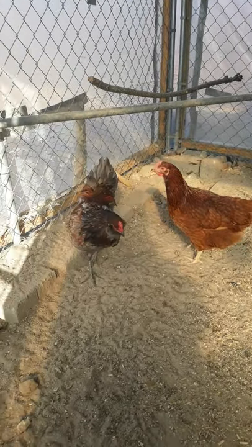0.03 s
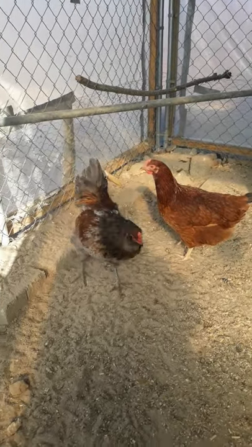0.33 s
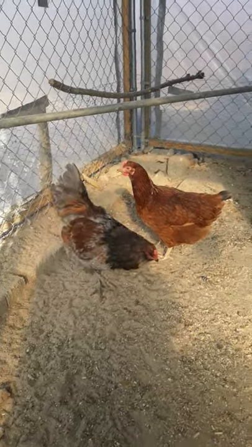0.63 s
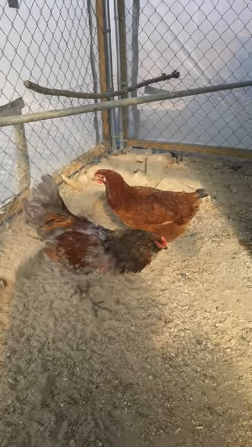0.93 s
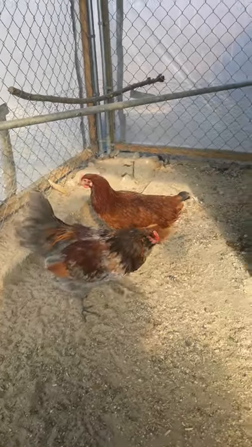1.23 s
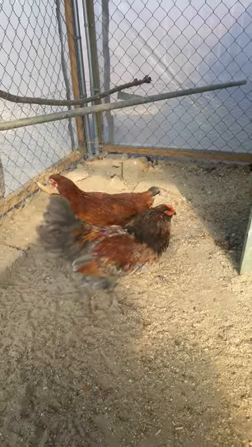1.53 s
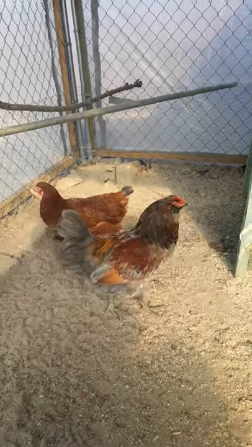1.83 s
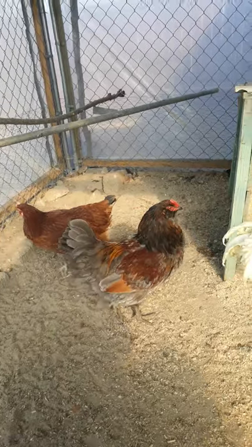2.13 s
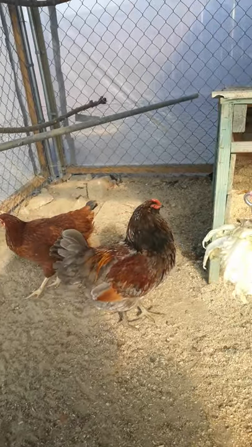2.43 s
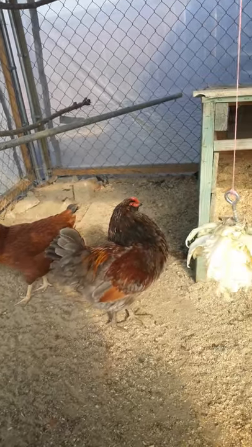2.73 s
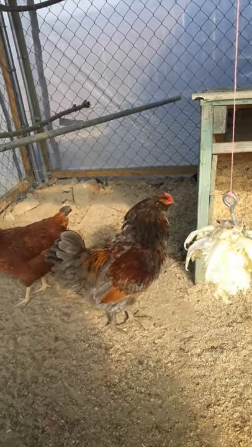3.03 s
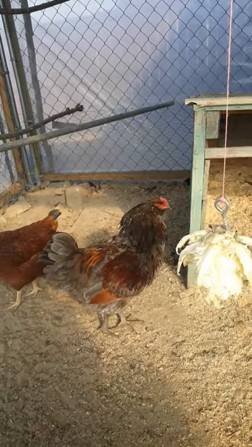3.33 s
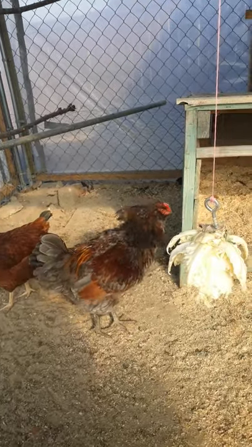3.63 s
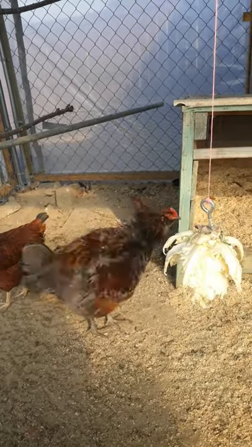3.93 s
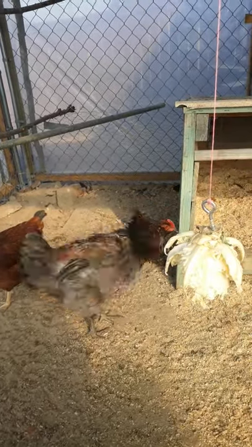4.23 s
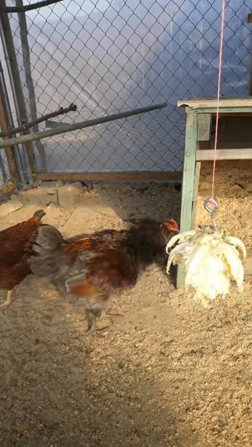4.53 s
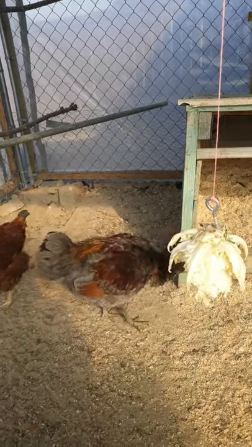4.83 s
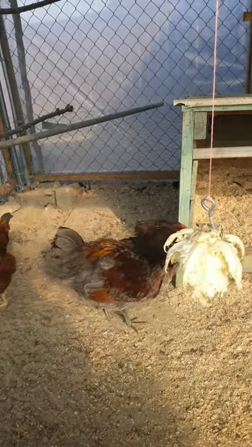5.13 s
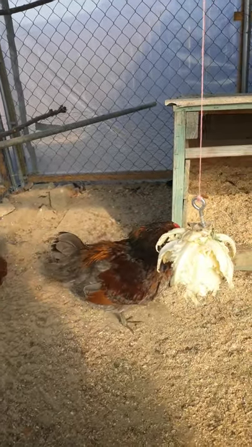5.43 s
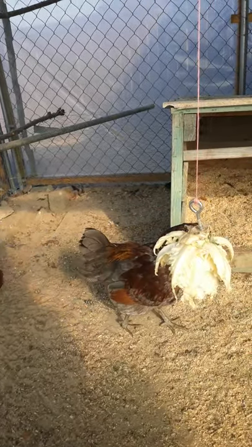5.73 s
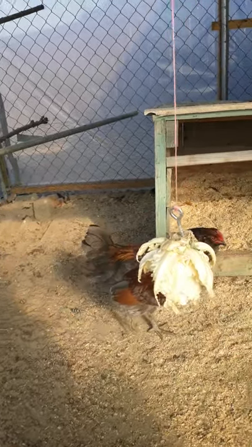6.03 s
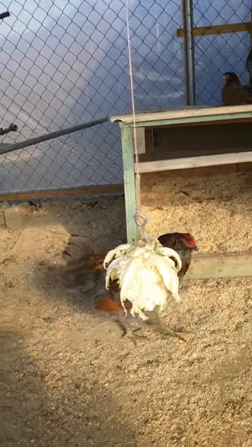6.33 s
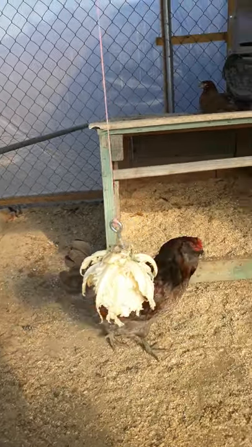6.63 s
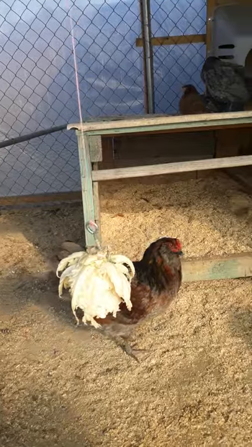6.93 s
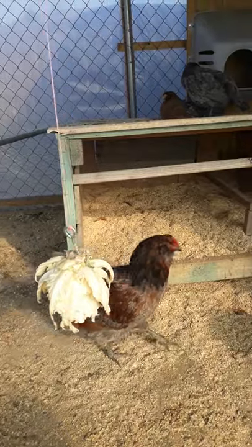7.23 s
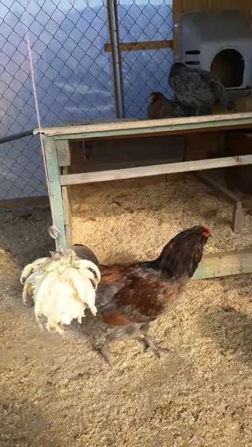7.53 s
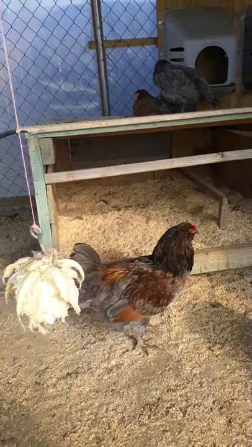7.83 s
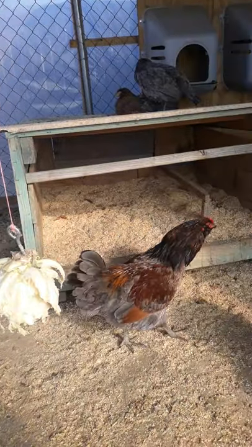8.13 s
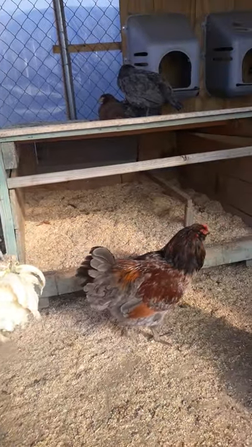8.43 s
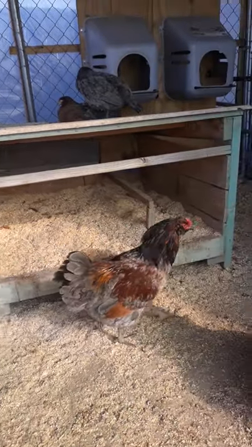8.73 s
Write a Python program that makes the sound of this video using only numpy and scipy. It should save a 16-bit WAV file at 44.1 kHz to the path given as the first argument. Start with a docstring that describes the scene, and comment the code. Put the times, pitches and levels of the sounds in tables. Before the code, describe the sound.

In the first second a rooster gives four short, soft clucks close by in a chicken run, the first the loudest. Outside, a truck approaches with a low drone, rumble and tyre hiss, loudest from about 2 to 3.5 seconds, its note sinking as it passes. Faint rustles of feet in dry bedding sound underneath. From about 3.9 to 4.5 seconds the rooster shakes out his feathers in a quick, papery flutter of several beats. Light rustles and gritty ticks follow, with a barely audible ring of a metal hook and one tiny cluck around 5 seconds. From about 5.4 to 6.2 seconds a faint squeal stutters, like distant brakes. The truck recedes, leaving a low, throbbing engine hum and a few soft steps and claw scuffs until the end at 9 seconds. Very faint, thin, even ticking and hiss run throughout.

```python
"""Soft clucks of a rooster sound over an approaching truck: pulses of his syrinx excite his vocal tract.
The truck passes fast; its exhaust note sinks by the Doppler shift and beats against a far engine's hum.
In his foil-walled run the bird shakes out his feathers, brushes a metal hook and walks off over dry
bedding, which rustles by stick-slip friction. Once the truck has gone by, a faint squeal stutters,
probably from brakes."""
import sys
import numpy as np
from scipy import signal
from scipy.fft import rfft, irfft
from scipy.io import wavfile

SR = 44100
rng = np.random.default_rng(int(sys.argv[2]) if len(sys.argv) > 2 else 0)


def materialize(psi):
    """Save the field psi as 16-bit PCM at rate SR to the path in sys.argv[1].

    A 1-D psi becomes a single channel; in a 2-D psi each row is a channel.
    """
    bounded = np.clip(np.atleast_2d(psi).T, -1, 1)
    quanta = np.round(bounded * 32767).astype(np.int16)
    wavfile.write(sys.argv[1], SR, quanta)


N = 396459
TIME = np.arange(N) / SR
FREQS = np.maximum(np.arange(N // 2 + 1) * SR / N, 1)
SPEED_M_PER_S, SOUND_M_PER_S = 33.95, 343
ROAD_M, NEAREST_S = 48.34, 3.024  # the truck's closest approach

# stereo balance of the bird and of the road: (frequency [Hz], left minus right [dB])
BIRD_SIDE = [(200, -1), (380, -4), (700, 1.5), (1300, 3.5), (1900, 6), (2500, 0), (3100, -4.5), (3800, -9),
             (4700, -10), (5700, -8), (7200, -12.5), (8300, -11), (15000, -9)]
ROAD_SIDE = [(110, -0.5), (200, -0.5), (300, -2), (420, -4), (580, -1.5), (750, 1.3), (1300, 3.5),
             (1650, 5), (2000, 8), (2500, 4.5), (3100, -2), (3800, -7), (4700, -8), (5700, -5.5),
             (7200, -8), (8200, -4), (15000, 11)]


def clucks(jitter, rasp):
    """Source and filter: uneven pulses of the syrinx excite resonances of chest, throat, mouth and beak."""
    # (time [s], length [s], pitch [Hz], level [dB], throat [Hz], mouth [Hz], mouth [dB], beak [dB])
    calls = [(.111, .032, 352, -32, 740, 1930, -11, -32), (.5, .028, 270, -37.5, 850, 1880, -10, -38),
             (.65, .038, 285, -38, 820, 1780, -19, -48), (.812, .034, 240, -38.5, 810, 1950, -19, -48),
             (5.122, .027, 255, -50.5, 980, 1450, -7, -45)]
    # resonances common to all clucks: (frequency [Hz], width [Hz], gain [dB])
    chest = (430, 340, -1.5)
    beak = [(2850, 500, -3), (3750, 600, -5), (5900, 700, -1), (7100, 900, 0)]
    throat_width_hz, mouth_width_hz, ramp_s = 340, 380, .005
    out, wobble, breath = np.zeros(N), drift(300), rng.standard_normal(N)
    for s, length, pitch_hz, level_db, throat_hz, mouth_hz, mouth_db, beak_db in calls:
        near = span(s - .02, s + .12)
        age = TIME[near] - s
        opening = np.clip(np.minimum(age, length - age) / ramp_s, 0, 1)
        cycles = np.cumsum(pitch_hz * (1 + jitter * wobble[near]) * (age > 0)) / SR
        pulses = np.diff(np.floor(cycles), prepend=0) * np.sqrt(SR / pitch_hz)
        source = opening * (pulses + rasp * breath[near])
        tract = [chest, (throat_hz, throat_width_hz, 0), (mouth_hz, mouth_width_hz, mouth_db)]
        lowpass = signal.butter(6, 1.17 * mouth_hz, fs=SR, output="sos")
        call = signal.sosfilt(lowpass, ring_in(source, tract)) + from_db(beak_db) * ring_in(source, beak)
        out[near] += from_db(level_db) * call / np.sqrt(np.sum(call ** 2) / (length * SR))
    muffled = 1 / (1 + (FREQS / 8000) ** 20)
    return irfft(rfft(out) * muffled * pan(per_hz(BIRD_SIDE)), N)


def feathers():
    """Stick-slip friction: stiff feathers flick at each swing of the body and in lighter ruffles."""
    # swings of the shake: (peak time [s], rise [s], fall [s], relative level [dB])
    swings = [(3.925, .012, .035, -57), (3.998, .015, 0.036, -47), (4.095, 0.012, 0.03, -44),
              (4.187, 0.015, 0.036, -44.5), (4.21, 0.0075, 0.023, -42.5), (4.29, .022, 0.018, -45),
              (4.381, 0.02, .028, -48.5)]
    # ruffles: (peak time [s], fall [s], relative level [dB])
    ruffles = [(1.479, 0.1, -68), (1.97, 0.11, -70), (2.505, .033, -60), (4.885, .025, -62.5),
               (4.98, 0.039, -61)]
    # spectrum: (frequency [Hz], level [dB])
    colour = [(500, -15), (1500, -1), (2800, -5.5), (3400, -7.5), (4300, -1), (5500, -2.5), (7300, 2.5),
              (8300, -8), (11000, -4.5), (13500, -6.5), (15200, -1)]
    strokes = swings + with_rise(ruffles, share=.39)
    flicks = friction(strokes, colour, slips_per_s=2000, size_db=2.5, hiss=.82)
    return flicks * from_db(1.3 * drift(140))  # tufts catch and let go


def plumage():
    """Dense, fine friction: the soft plumage lifts, then rustles all through the shake."""
    # (peak time [s], rise [s], fall [s], relative level [dB])
    strokes = [(3.92, .04, .11, -57), (4.23, .14, .16, -52)]
    # spectrum: (frequency [Hz], level [dB])
    colour = [(1000, -9), (2800, -3), (4300, -2), (5500, -2.5), (7300, 0), (8300, -15), (15500, -15)]
    return friction(strokes, colour, slips_per_s=3000, size_db=2.5, hiss=.99)


def bedding():
    """Friction and fracture: dry litter rustles and grit snaps under the feet."""
    # steps and settling feathers: (peak time [s], fall [s], relative level [dB])
    rustles = [(.21, 0.032, -71), (.42, .06, -71), (.77, 0.06, -70), (1.42, .06, -62.5), (1.5, 0.094, -62),
               (1.75, .05, -65), (1.87, 0.16, -63), (2.06, 0.072, -70), (2.2, .15, -63), (2.5, 0.11, -63.5),
               (4.52, 0.21, -72), (4.697, 0.079, -58.5), (4.795, 0.045, -64.5), (4.885, 0.067, -59.5),
               (4.98, .055, -65), (5.122, 0.035, -65.5), (5.285, 0.07, -67.5), (5.685, 0.045, -59.5),
               (6.3, 0.11, -74.5), (6.51, 0.061, -65.5), (6.66, .03, -68), (6.725, 0.03, -64.5),
               (7.3, .06, -73), (7.42, 0.12, -67.5), (7.81, .09, -72), (8.18, 0.05, -62.5),
               (8.425, 0.056, -66.5), (8.76, 0.17, -72), (8.85, 0.063, -61.5)]
    # snaps of grit: (time [s], relative level [dB])
    ticks = [(4.693, -57), (4.792, -61), (4.864, -57), (4.886, -55), (5.119, -59), (5.233, -65),
             (5.28, -62), (5.67, -63), (6.506, -60), (6.717, -59), (8.933, -58)]
    # spectrum: (frequency [Hz], level [dB])
    colour = [(1000, -14.5), (3200, -15), (4200, -5), (5500, -5.5), (6500, 0.5), (7500, -1), (8400, -20),
              (12000, -19), (15500, -10.5)]
    litter = friction(with_rise(rustles, share=.27), colour, slips_per_s=3000, size_db=4.5, hiss=.7)
    clumping = from_db(1.6 * drift(70))  # the litter gives way in clumps
    rise_s, fall_s = .00035, .0024
    snaps = [(s, rise_s, fall_s, db) for s, db in ticks]
    return litter * clumping + friction(snaps, colour, slips_per_s=5000, size_db=0, hiss=1)


def scuffs():
    """Sliding friction: claws on packed earth make short swells of rough, band-limited noise."""
    # (peak time [s], rise [s], fall [s], level [dB], centre [Hz], width [Hz], left minus right [dB])
    drags = [(.215, .015, .03, -69, 3700, 1000, 2), (.44, .02, .035, -67, 3900, 1500, 2),
             (.51, .01, .04, -65, 3200, 2000, 2), (.65, .015, .035, -67.5, 3100, 1500, 2),
             (.81, .05, .14, -66.5, 4100, 1500, 0), (6.657, 0.0044, 0.054, -62.5, 1670, 1300, 5),
             (7.825, .008, 0.065, -60.5, 2050, 750, 4), (8.55, .06, .15, -81, 4300, 1100, -9),
             (8.775, 0.012, 0.05, -65, 2400, 750, 0)]
    out = np.zeros((2, N))
    for s, rise, fall, level_db, hz, width_hz, pan_db in drags:
        near = span(s - .3, s + .7)
        age = TIME[near] - s
        scrape = ring_in(rng.laplace(size=(2, len(age))), [(hz, width_hz, 0)]) * pan(pan_db)
        out[:, near] += from_db(level_db) * stroke(age, rise, fall) * unit_mid(scrape)
    return out


def hook(touch_s):
    """Free vibration: brushed once, the metal feed hook rings in two modes that waver as it swings."""
    # (frequency [Hz], level [dB], time to fall 60 dB [s])
    modes = [(5270, -71, 0.41), (10000, -68.5, 0.19)]
    age = np.clip(TIME - touch_s, 0, 1)
    return sum(from_db(db - 60 * age / t60) * np.sin(2 * np.pi * hz * age + .33 * drift(250))
               for hz, db, t60 in modes)


def exhaust(phase):
    """Spherical spreading: the truck's exhaust note swells as it passes; now and then it fades away."""
    # (level alongside [dB], gain ahead [dB], gain behind [dB])
    levels = (-32.3, 4, -6)
    # (time [s], spread [s], depth [dB])
    fades = [(.04, 0.068, 13), (.62, 0.11, 12.5), (1.1, 0.12, 12), (1.72, 0.32, 8), (7.7, 0.73, 17.5)]
    faded_db = sum(depth_db * bell(s, spread) for s, spread, depth_db in fades)
    return passing(*levels) * from_db(.69 * drift(12) - faded_db) * np.sin(phase)


def overtones(exhaust_phase):
    """Amplitude modulation: the truck's overtones swell and fade at their own moments, fluttering."""
    # (multiple of the exhaust note, relative level [dB], peak time [s], spread [s])
    partials = [(1.96, -41.5, .95, .3), (1.96, -41, 1.7, .3), (1.95, -37, 2.43, .13),
                (1.954, -45.5, 3.9, .25), (1.56, -42, 1.3, .2), (2.46, -41, 1.85, .22),
                (2.38, -47, 3.95, .28), (2.66, -46, 1.7, .55), (3.255, -48, 1.2, .45),
                (3.235, -44.5, 2.65, .3), (3.24, -45.5, 3.8, .36), (3.45, -48, 3.9, .3),
                (3.28, -61, 5.2, .6), (3.72, -43, 2.95, .25), (3.8, -43.5, 3.8, .22),
                (4.03, -50, 4.28, .15), (4.32, -50, 1.9, .35), (4.32, -43, 2.95, .3), (4.4, -48.5, .1, .3),
                (4.78, -48.5, .4, .4), (5.06, -51, 1.8, .3), (6.47, -50, 1.1, .2)]
    flutter_db, smear_rad = 2.5, .6
    out = np.zeros(N)
    for multiple, level_db, s, spread in partials:
        near = span(s - 4 * spread, s + 4 * spread)
        t = TIME[near]
        gain = from_db(level_db + flutter_db * drift(18, t) - 2) * bell(s, spread, t)
        out[near] += gain * np.sin(multiple * exhaust_phase[near] + smear_rad * drift(22, t))
    return out


def whistle(phase):
    """Random modulation of level and phase roughens a faint whistle that rides on the truck."""
    # (time [s], spread [s], relative level [dB])
    swells = [(1.12, .04, -73), (1.36, .13, -74), (3.76, 0.06, -74.5), (5.63, .06, -84)]
    envelope = sum(from_db(level_db) * bell(s, spread) for s, spread, level_db in swells)
    return envelope * from_db(3.5 * drift(25) - 1.5) * np.sin(phase + 2.3 * drift(140))


def engines():
    """Doppler shift and beats: the truck's note drops as it passes and throbs against the far hum."""
    exhaust_hz, whistle_hz, rev_up_per_s = 107.153, 3185, .0071
    _, heading = truck_path(lead_s=0)
    shift = (1 + rev_up_per_s * TIME) / (1 - heading * SPEED_M_PER_S / SOUND_M_PER_S)
    phase = phase_of(exhaust_hz * shift)
    tones = exhaust(phase) + far_engine() + overtones(phase) + whistle(phase_of(whistle_hz * shift))
    return np.sqrt(2) * tones * pan(-.45)


def road_roar():
    """Incoherent sources add in power: each band of the truck's roar swells over steady far traffic."""
    # spectrum: (frequency [Hz], level [dB])
    colour = [(25, -28), (45, -22), (70, -8), (100, 1), (160, 4), (250, -1), (400, -3.5), (750, -9),
              (1100, -19), (1500, -24), (1900, -25.3), (2500, -29)]
    # bass, rumble, body, tyre roar and tread:
    # (level alongside [dB], gain ahead [dB], gain behind [dB], absorption [dB/m], far traffic [dB])
    bands = [(-47, -6, -12, 0, -66), (-36.3, 2, -14.5, 0.04, -62), (-39, -1.5, -9.5, 0.0944, -76),
             (-44, 10.3, -7, 0.05, -68), (-55.4, 12, -1.3, 0.036, -83)]
    # limits of those bands [Hz]
    edges = (25, 110, 290, 660, 1200, 2100)
    below = [1 / (1 + (FREQS / hz) ** 10) for hz in edges]
    roar = rfft(noise(from_db(per_hz(colour)), ROAD_SIDE))
    out = np.zeros((2, N))
    for low, high, (*truck_db, far_db) in zip(below, below[1:], bands):
        band = irfft(roar * high * (1 - low), N)
        gain = np.hypot(passing(*truck_db), from_db(far_db)) * from_db(drift(15))
        out += gain * unit_mid(band)
    return out


def tyre_hiss():
    """A moving noise source: the hiss shifts rightwards as the truck draws level; a swell follows it."""
    # spectrum: (frequency [Hz], level [dB])
    colour = [(1700, -17), (2200, 7.3), (2700, 6.3), (3300, -0.5), (3800, -1.5), (4400, -0.5), (5000, -1.8),
              (5600, -5), (7300, -5), (8200, -25.5), (16000, -28)]
    # (level alongside [dB], gain ahead [dB], gain behind [dB], absorption [dB/m], far traffic [dB])
    levels = (-62.5, 8, -15, 0.05, -83.5)
    # balance during the approach: (frequency [Hz], left minus right [dB])
    ahead_side = [(2000, 7.5), (2500, 6), (3100, 3.5), (3800, 0), (4700, -1.5), (5700, -2), (7200, -7.5),
                  (8200, -4), (15000, 11)]
    *truck_db, far_db = levels
    spectrum = from_db(per_hz(colour))
    ahead = np.interp(TIME, [1.2, 2.5], [1, 0])
    hiss = np.sqrt(ahead) * noise(spectrum, ahead_side) + np.sqrt(1 - ahead) * noise(spectrum, ROAD_SIDE)
    wake = bell(s=3.65, spread=.42) * noise_band(level_db=-64.5, hz=1850, width_hz=1500)
    return np.hypot(passing(*truck_db), from_db(far_db)) * hiss + wake


def road(lag_s):
    """Path difference: the noise of the road arrives slightly later on the right."""
    left, right = tyre_hiss() + road_roar()
    late = irfft(rfft(right) * np.exp(-2j * np.pi * FREQS * lag_s), N)
    return np.array([left, late])


def truck_path(lead_s):
    """Straight-line motion: distance over its minimum, and heading cosine (1 coming, -1 going)."""
    to_go = SPEED_M_PER_S * (NEAREST_S - lead_s - TIME)
    distance = np.hypot(to_go, ROAD_M)
    return distance / ROAD_M, to_go / distance


def passing(alongside_db, ahead_db, behind_db, absorbed_db_per_m=0):
    """Spherical spreading, absorption and directivity set the gain of a source on the truck."""
    distance, heading = truck_path(lead_s=.36)  # sound thrown forward peaks before the truck is nearest
    aimed_db = np.where(heading > 0, ahead_db, behind_db) * heading ** 2
    absorbed_db = absorbed_db_per_m * ROAD_M * (distance - 1)
    return from_db(alongside_db + aimed_db - absorbed_db) / distance


def far_engine():
    """Beats: weak neighbouring notes make a slowly sinking hum with two faint overtones throb unevenly."""
    # (time [s], level [dB])
    levels = [(0, -68), (2.0, -61), (2.7, -39.5), (5.0, -44.3), (8.99, -44.3)]
    # (multiple of the hum, level against it [dB])
    partials = [(.797, -20), (.92, -18.5), (1.098, -20), (1.18, -23), (2, -22.5), (2.98, -37)]
    hum_hz, sag_hz_per_s, smear_rad = 115.86, .4869, .6
    phase = phase_of(hum_hz - sag_hz_per_s * TIME)
    weak = sum(from_db(db) * np.sin(multiple * phase + smear_rad * drift(6)) for multiple, db in partials)
    level_db = np.interp(TIME, *np.transpose(levels)) + .5 * drift(8.5)
    return from_db(level_db) * (np.sin(phase) + weak)


def brakes():
    """Friction-excited vibration: pads squeal in bursts, over a soft swell of tyre noise from the road."""
    # (time [s], length [s], relative level [dB], pitch [Hz])
    bursts = [(5.357, .028, -49, 1048), (5.394, .042, -52, 1068), (5.517, .045, -48, 1050),
              (5.618, .03, -51, 1060), (5.647, .022, -47.5, 1052), (5.672, .026, -47.5, 1038),
              (5.712, .038, -49, 1058), (5.752, .04, -46.5, 1062), (5.847, .035, -47.5, 1060),
              (5.884, .048, -48, 1066), (5.938, .045, -51, 1072), (6.004, .042, -47.5, 1070),
              (6.07, .055, -51.5, 1085), (6.138, .03, -48.5, 1076)]
    squeal, waver, chatter = np.zeros(N), .42 * drift(110), from_db(1.7 * drift(130))
    for s, length, level_db, hz in bursts:
        near = span(s - length / 2, s + 2 * length)
        grip = np.exp(-(2 * (TIME[near] - s - length / 2) / length) ** 4)
        tone = np.sin(2 * np.pi * hz * TIME[near] + waver[near])
        squeal[near] += from_db(level_db) * grip * rms_one(chatter[near]) * tone
    tyre_swell = bell(s=5.85, spread=.5) * noise_band(level_db=-63.5, hz=1230, width_hz=450)
    return enclosure(squeal * from_db([[3], [-5]]), t60=.3, wet_db=-12) + tyre_swell


def interference():
    """A filtered impulse train: faint, thin ticks at an even pace, probably electrical."""
    first_s, period_s, spread_db = .248, .1024, 2.5
    at = (np.arange(first_s, TIME[-1], period_s) * SR).astype(int)
    clicks = np.zeros(N)
    clicks[at] = from_db(-49 + spread_db * rng.standard_normal(len(at)))
    return irfft(rfft(clicks) * resonance(hz=8300, width_hz=5000), N)


def background():
    """Filtered noise: far tyres roar steadily, the air hisses and a narrow sizzle swells and fades."""
    # spectrum of the hiss: (frequency [Hz], level [dB])
    colour = [(100, 1.5), (2500, -17.5), (3200, 8.5), (4300, 3), (5400, 2.5), (7200, 12), (8300, 3),
              (11000, 5), (15500, 7.5)]
    sizzle = bell(s=7.3, spread=.57) * noise_band(level_db=-82.5, hz=4290, width_hz=800)
    air = from_db(-76.5) * noise(from_db(per_hz(colour)), side=[(100, 0), (15000, -.43)])
    far_roar = noise_band(level_db=-65, hz=830, width_hz=380)
    return far_roar + air + sizzle


def friction(strokes, colour, slips_per_s, size_db, hiss):
    """Shot noise: each stroke is a shower of tiny slips of uneven size over a smooth hiss."""
    power = np.zeros(N)
    for s, rise, fall, level_db in strokes:
        near = span(s - .4, s + .7)
        power[near] += (from_db(level_db) * stroke(TIME[near] - s, rise, fall)) ** 2
    slips = np.zeros((2, N))
    born = rng.random((2, N)) < slips_per_s / SR
    sizes = from_db(size_db * np.minimum(rng.exponential(1, born.sum()), 5))
    slips[born] = sizes * rng.choice([-1, 1], len(sizes))
    grain = rms_one(slips) + hiss * rng.standard_normal((2, N))
    return np.sqrt(power) * stereo(grain, from_db(per_hz(colour)), BIRD_SIDE)


def enclosure(x, t60, wet_db):
    """Reverberation: the walls of the run return a short diffuse tail, different at each ear."""
    age = np.arange(SR // 2) / SR
    tail = rng.standard_normal((2, len(age))) * from_db(-60 * age / t60) * (age > .006)
    tail /= np.sqrt(np.sum(tail ** 2, axis=1, keepdims=True))
    return x + from_db(wet_db) * signal.fftconvolve(x, tail, axes=1)[:, :N]


def stereo(pair, spectrum, side):
    """Spatial coherence: two unrelated signals are coloured, merge in the bass and lean to one side."""
    # (frequency [Hz], left-right correlation)
    coherence = [(30, .995), (170, .998), (300, .975), (640, .76), (1400, .55), (3100, 0), (15000, 0)]
    alike = np.clip(per_hz(coherence), -1, 1)
    mid, spread = rfft(pair)
    both = np.sqrt(1 + alike) * mid + np.array([[1], [-1]]) * np.sqrt(1 - alike) * spread
    return unit_mid(irfft(both * spectrum * pan(per_hz(side)), N))


def noise(spectrum, side):
    """Gaussian stereo noise with a given spectrum."""
    return stereo(rng.standard_normal((2, N)), spectrum, side)


def noise_band(level_db, hz, width_hz):
    """Band-pass noise from the direction of the road."""
    return from_db(level_db) * noise(resonance(hz, width_hz), ROAD_SIDE)


def resonance(hz, width_hz):
    """Frequency response of two equal resonators in cascade, 1 at its peak."""
    return 1 / (1 + 1j * hz / width_hz * (FREQS / hz - hz / FREQS)) ** 2


def ring_in(x, resonances):
    """Parallel resonators, each applied twice for steep skirts."""
    out = 0
    for hz, width_hz, db in resonances:
        b, a = signal.iirpeak(hz, hz / width_hz, fs=SR)
        out = out + from_db(db) * signal.lfilter(b, a, signal.lfilter(b, a, x))
    return out


def stroke(age, rise, fall):
    """A Gaussian rise to 1, then exponential decay."""
    return np.exp(-np.where(age < 0, (age / rise) ** 2 / 2, age / fall))


def with_rise(rows, share):
    """Give each stroke a rise time in proportion to its fall."""
    return [(s, share * fall, fall, level_db) for s, fall, level_db in rows]


def bell(s, spread, t=TIME):
    """A Gaussian swell to 1 around a moment."""
    return np.exp(-((t - s) / spread) ** 2 / 2)


def drift(rate, t=TIME):
    """Random modulation of unit power, with `rate` new values a second."""
    knots = rng.standard_normal(int(rate * N / SR) + 2)
    return rms_one(np.interp(t * rate, np.arange(len(knots)), knots))


def phase_of(hz):
    """Phase is the running integral of frequency."""
    return 2 * np.pi * np.cumsum(hz) / SR


def per_hz(points):
    """Linear interpolation over log frequency."""
    hz, value = np.transpose(points)
    return np.interp(np.log(FREQS), np.log(hz), value)


def span(start_s, end_s):
    """The samples between two moments."""
    return slice(max(int(start_s * SR), 0), int(end_s * SR))


def pan(difference_db):
    """Left and right gains for a level difference."""
    return from_db(np.array([[.5], [-.5]]) * difference_db)


def from_db(db):
    """Decibels to amplitude ratio."""
    return 10 ** (np.asarray(db) / 20)


def rms_one(x):
    """Scale to unit power."""
    return x / np.sqrt(np.mean(x ** 2) + 1e-20)


def unit_mid(pair):
    """Scale so that the mean of both channels has unit power."""
    return pair / np.std(pair.mean(axis=0))


def scene():
    """Superposition: the bird in his reverberant run, the traffic outside and a faint background."""
    rustling = from_db(-3.5) * (feathers() + plumage() + bedding())
    bird = rustling + scuffs() + clucks(jitter=.04, rasp=.59) + hook(touch_s=4.972)
    run = enclosure(bird, t60=.28, wet_db=-11)
    return run + background() + road(lag_s=.00016) + engines() + brakes() + interference()


def record(dry):
    """Band limiting: an elliptic low-pass cuts the top steeply."""
    cutoff_hz = 15780
    return signal.sosfilt(signal.ellip(12, .1, 80, cutoff_hz, fs=SR, output="sos"), dry)


dry = scene()
out = record(dry)
materialize(out)
```